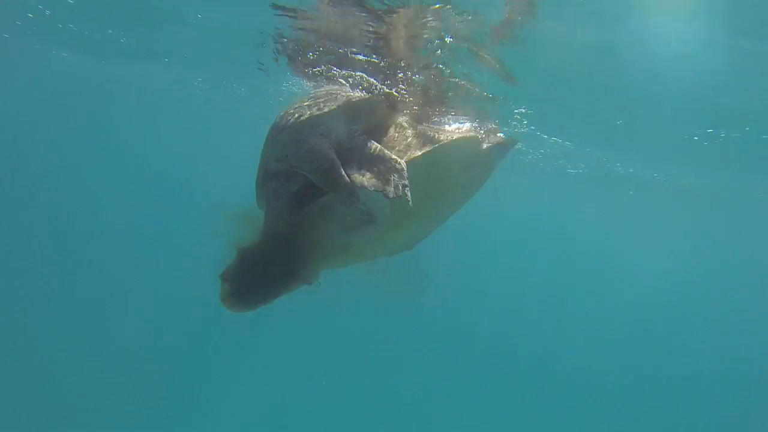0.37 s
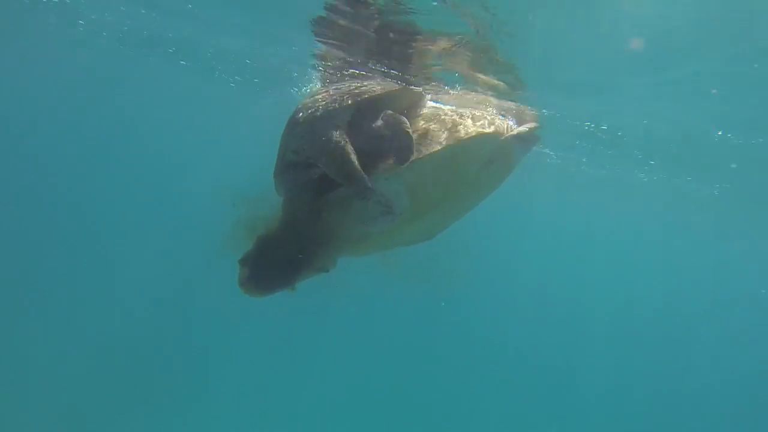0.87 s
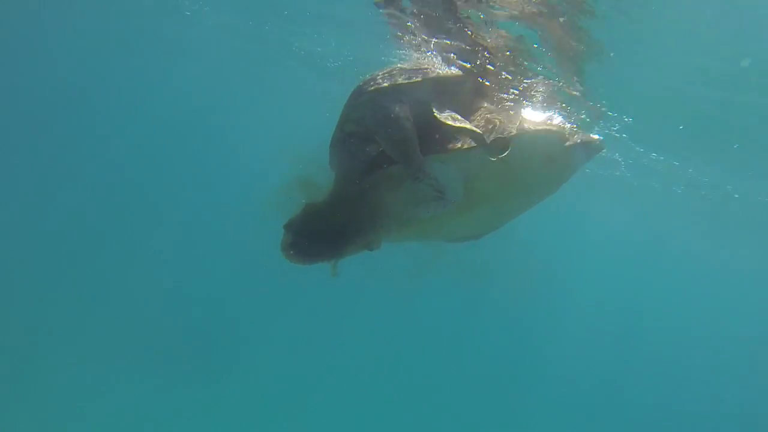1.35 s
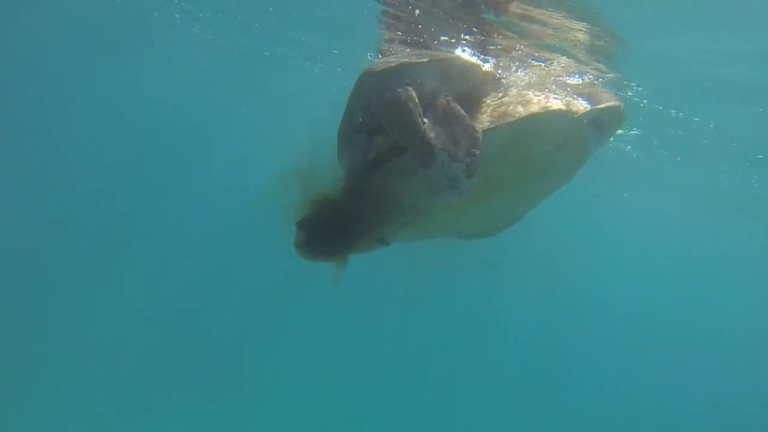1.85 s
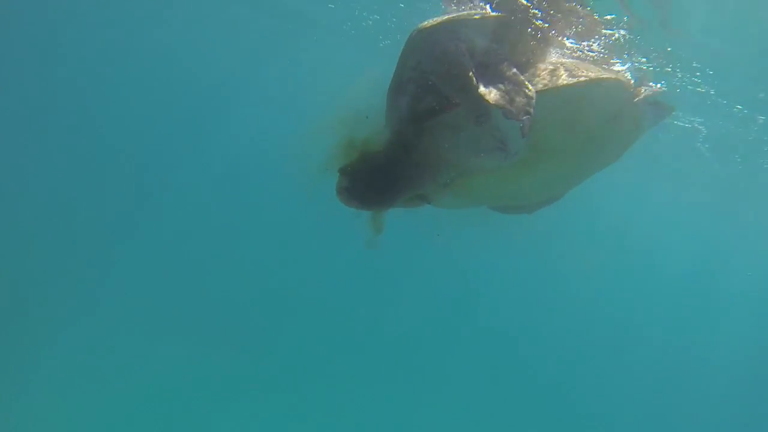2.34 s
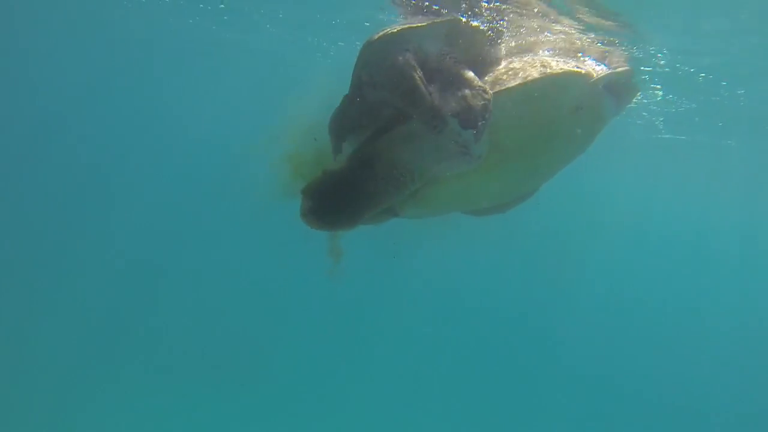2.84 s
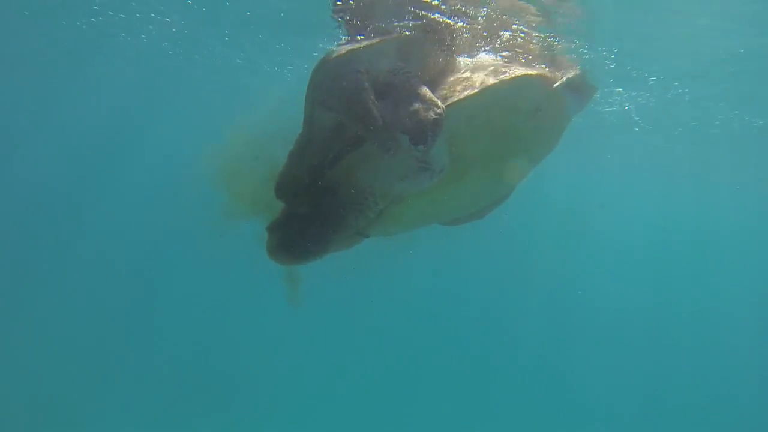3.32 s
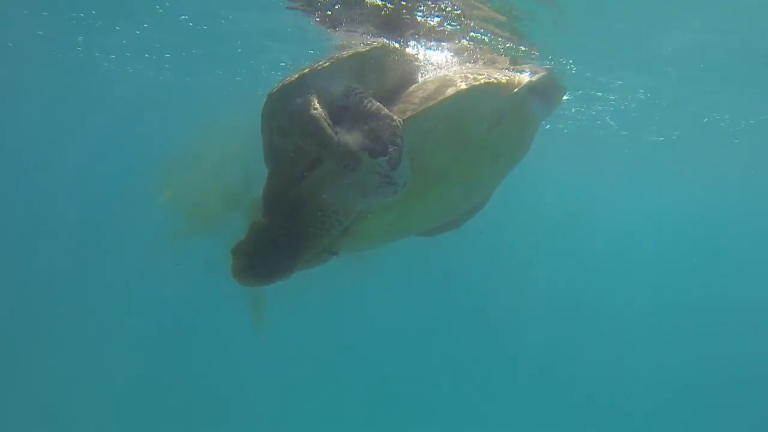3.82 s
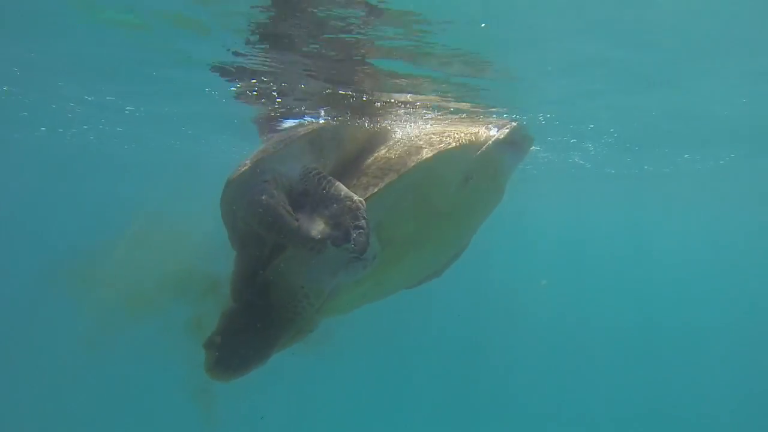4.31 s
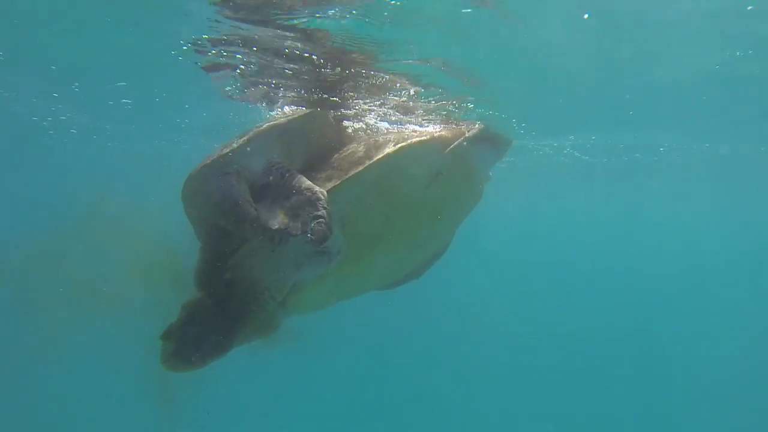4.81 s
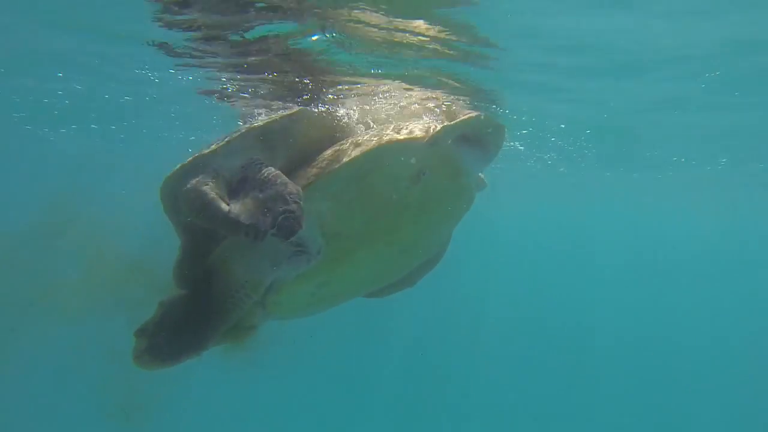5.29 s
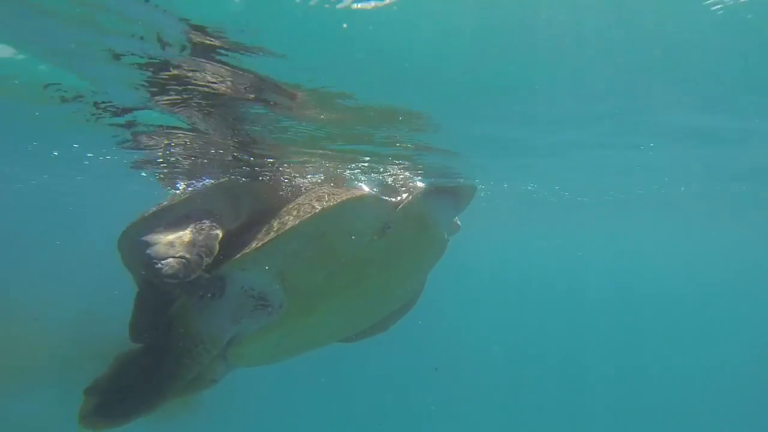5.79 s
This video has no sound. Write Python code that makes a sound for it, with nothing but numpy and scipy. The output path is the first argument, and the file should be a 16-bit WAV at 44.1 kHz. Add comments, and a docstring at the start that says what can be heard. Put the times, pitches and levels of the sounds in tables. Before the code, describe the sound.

A muffled, close underwater perspective: sub-bass rumble opens with a strong bump and keeps swelling and easing. Sparse clicks and snaps tick through the housing, sharper around one and three seconds, with short bubble plops more frequent from the middle. Soft surface wash, distant crackling and weak circuit hiss lie beneath. A prominent round bloop comes just before the end. The turtle itself makes no distinct sound.

```python
"""A deep rumble of surging water, under lapping, far crackle, nearer snaps and bubbles, hiss and a faint whine.
A camera in a sealed housing drifts just under the sea surface: the rumble is noise swelled by passing water,
lapping and crackle are noise, small bubbles and clicks through the housing's resonances, snaps are short noise
bursts, bubbles and other near rings are damped sines, and the camera's circuits add shaped hiss, steady tones
and a whine pulsed once per picture."""
import sys
import numpy as np
from scipy import signal
from scipy.fft import rfft, irfft, next_fast_len
from scipy.io import wavfile
from scipy.ndimage import uniform_filter1d, map_coordinates

SR = 44100
rng = np.random.default_rng(int(sys.argv[2]) if len(sys.argv) > 2 else 0)


def master_out(mix):
    """Clip the mix to full scale and print it as 16-bit PCM to the path in sys.argv[1]."""
    frames = np.transpose(np.atleast_2d(mix))
    ceiling = np.clip(frames, -1, 1)
    pcm = np.round(ceiling * 32767).astype(np.int16)
    wavfile.write(sys.argv[1], SR, pcm)


def voltage_ratio(decibels):
    """Convert decibels (scalar or array-like) to amplitude ratios, 20 dB per decade."""
    exponent = np.asarray(decibels, float) / 20
    return 10 ** exponent


N = 260631

# Swells of water against the housing.
# Each row: centre in seconds, level in dB before the deep filter, width in seconds (to 1/e of the power).
SWELLS = [(0, -12.5, 0.083), (0.178, -20, 0.053), (.33, -23.5, 0.14), (0.63, -21.5, 0.23),
          (0.741, -17.5, 0.047), (0.895, -21, 0.097), (1.058, -19.5, 0.067), (1.172, -21, 0.041),
          (1.405, -22, 0.076), (1.546, -17.5, 0.12), (1.7, -24.5, 0.058), (1.963, -22, 0.26),
          (2.3, -26.5, 0.3), (2.581, -20.5, 0.046), (2.686, -21.5, 0.025), (2.922, -24.5, 0.33),
          (3.11, -29, 0.047), (3.34, -23.5, 0.17), (3.447, -19.5, 0.031), (3.62, -23.5, 0.17),
          (3.897, -29.5, 0.034), (4.3, -21, 0.18), (4.433, -15.5, 0.061), (4.591, -20, 0.044),
          (4.701, -14.5, 0.058), (4.796, -22, 0.084), (5.055, -21, 0.15), (5.183, -21.5, 0.035),
          (5.298, -17, 0.052), (5.51, -24, 0.1), (5.7, -38, 0.14), (5.82, -18.5, 0.28)]
# Fine churn of the water. Each row: time in seconds, level in dB rms before its wobble.
CHURN_LEVEL = [(0.1, -41.5), (0.39, -46), (0.8, -43.5), (1.1, -46), (1.56, -42.5), (2.08, -46), (3.04, -51),
               (3.15, -43.5), (3.43, -52), (4.15, -47), (4.6, -44), (5.69, -46.5)]
# Water and camera over time. Each row: time in seconds, lapping in dB rms, far crackle in dB before
# the offset of each band, turn of the camera (no unit, roughly -1 to 1).
WATER = [(0.0, -58, -55.5, -0.36), (0.59, -59.5, -57, -0.94), (1.1, -57, -57.5, -0.41),
         (1.5, -55.5, -55.5, 0.32), (2.11, -57.5, -56.5, 0.76), (2.52, -55.5, -54.5, 0.47),
         (2.78, -56.5, -57, .6), (2.91, -53.5, -55.5, -0.32), (3.0, -55, -61, -0.79),
         (3.3, -54.5, -61.5, -1.2), (3.38, -55, -58.5, -0.49), (3.54, -55.5, -58, -0.9),
         (3.77, -57, -57, -0.089), (4.1, -54.5, -57.5, -0.64), (4.44, -56.5, -56.5, -1),
         (4.92, -56, -56.5, -0.29), (5.12, -57.5, -56.5, -0.59), (5.38, -58, -60, -0.38),
         (5.91, -60.5, -57.5, -0.71)]
# Spectra of the noise layers. Each row: frequency in Hz, relative level in dB.
SURGE_COLOUR = [(3, -45), (8, -4.5), (13, 4), (30, 3), (38, -5), (46, 4), (54, -33), (80, -70)]
CHURN_COLOUR = [(30, -52), (52, -3.5), (62, 1.5), (68, -2), (77, -8.5), (88, -15), (102, -21), (130, -61)]
SWIRL_COLOUR = [(60, -43), (105, -1.5), (140, -2.5), (170, -7.5), (300, -11.5), (600, -26)]
LAP_COLOUR = [(100, -43), (250, 3.5), (450, -2.5), (800, -1), (1300, -13.5), (2500, -47)]
CRACKLE_COLOUR = [(400, -20), (1000, -1.5), (2000, 3), (3600, -4), (4300, -10), (9000, -22.5), (15000, -28)]
HISS_COLOUR = [(500, 4.5), (2000, 1), (4500, -2.5), (7200, -3), (8600, -8), (10000, -6.5), (12800, -7),
               (14000, -12), (15200, -19)]
# Resonances of the housing. Each row: centre in Hz, width in Hz, gain in dB.
HOUSING_MODES = [(436, 170, -3.5), (680, 168, 2.5), (1140, 132, -2), (1661, 172, 2), (2508, 210, -2),
                 (2993, 374, -2), (3580, 110, -14)]
# Whine partials. Each row: frequency in Hz, level in dB rms while on (before its scatter),
# random phase step per picture in turns.
WHINE = [(5699, -75, .2), (11398, -74, .3)]
# Steady circuit tones. Each row: frequency in Hz, level in dB rms.
TONES = [(9830, -99), (9890, -94), (11149, -98), (6893, -98)]
# Near rings: bubbles, plus the ringing tail of the knock at 5.61 s and the overtones at the onset of the big
# gulp at 5.676 s. Each row: start in seconds, peak in dB, starting pitch in Hz, decay by 60 dB in seconds.
NEAR_RINGS = [(.17, -47.5, 144, 0.15), (.2, -55.5, 210, 0.49), (0.758, -44.5, 133, 0.12),
              (1.485, -52, 900, 0.064), (1.664, -43, 480, 0.083), (1.727, -41, 146, 0.052),
              (1.727, -48, 279, 0.099), (1.73, -50.5, 211, 0.8), (1.885, -47.5, 659, 0.11),
              (2.634, -48, 566, 0.063), (2.982, -46.5, 433, 0.14), (3.046, -36, 718, 0.1),
              (3.065, -47, 1810, 0.03), (3.094, -44.5, 442, .093), (3.203, -44.5, 450, 0.11),
              (3.444, -42.5, 656, 0.1), (3.63, -52.5, 804, .088), (3.843, -45.5, 556, .044),
              (3.865, -43, 426, 0.075), (4.062, -46.5, 343, 0.073), (4.237, -45.5, 750, 0.064),
              (4.45, -46, 618, 0.12), (4.487, -40.5, 633, .027), (4.689, -47, 704, 0.1),
              (4.723, -41.5, 111.4, 0.29), (5.332, -49, 578, 0.14), (5.366, -48.5, 626, 0.16),
              (5.611, -36, 640, 0.041), (5.676, -37.5, 1030, 0.021), (5.676, -46.5, 276, 0.081),
              (5.677, -43, 1470, 0.03), (5.805, -47, 666, 0.067)]
# Near snaps. Each row: start in seconds, level in dB before the path gains, tilt in dB per octave,
# extra ring of the main mode in dB, decay to 1/e in seconds (the tick's is shorter).
SNAPS = [(0.221, -55, 2, 4, 0.004), (0.3874, -50.0, -1, -1.0, 0.0029), (0.404, -47.0, 1, 4, 0.0041),
         (0.465, -52, 2, -7, 0.0037), (0.558, -56.5, 5, -5, 0.0039), (0.6696, -47, -1, -6, 0.0035),
         (0.6905, -45.5, -3, -9, 0.0095), (0.963, -57, -7.5, -7, 0.003), (1.1005, -59.5, 2.1, 18.5, 0.003),
         (1.264, -40.5, -2.5, -2, 0.0024), (1.277, -45.5, 0.5, -1.0, 0.0058), (1.324, -58, -6, 20, 0.0039),
         (1.4413, -54.5, 3, 13, 0.0041), (1.598, -49.5, 2.5, -11, 0.004), (1.724, -48, -0.3, 3, 0.0038),
         (1.776, -54.5, 1.5, 15.5, 0.0046), (1.798, -53, 1.5, -2.0, 0.0055), (2.044, -49, -2, 7.5, 0.0054),
         (2.27, -48.5, 0, 2.0, 0.0028), (2.324, -54, -8, 19.5, 0.0021), (2.531, -48.5, -8.5, 3, 0.0028),
         (2.604, -45.5, 2.9, 10, 0.0086), (2.7072, -59.5, 1.5, 14, 0.0017), (2.824, -49, 1.5, 9, 0.0055),
         (2.9287, -38.5, -0.5, 1, 0.0061), (3.0016, -50, 0.0, -10.0, 0.0039),
         (3.0954, -53, -3, -12, 0.0026), (3.335, -48.5, -0.5, -2, 0.0043),
         (3.3647, -60.5, 6.5, -8.0, 0.0025), (3.401, -57, -2, 0, 0.0032), (3.442, -54.0, -3, 5, 0.0037),
         (3.7674, -47, 5, 16.5, 0.006), (3.984, -49.5, -2, 9.0, 0.0083),
         (4.1049, -49.5, -0.5, 14.5, 0.0031), (4.217, -58, -3, 15, 0.0026),
         (4.2337, -48.5, 0.0, 5.5, 0.0051), (4.2648, -53, 1, 3, 0.004), (4.297, -55, 4.8, 0.0, 0.0055),
         (4.411, -50, -0.5, 4, 0.0059), (4.4712, -41.5, -7.5, 7.5, 0.0033),
         (4.6089, -53.5, -3, 17.5, 0.0028), (4.793, -48.5, 0.5, -7.0, 0.0038),
         (4.827, -55.5, -8, 15.0, 0.0034), (4.8875, -61, -4, 24, 0.0031), (4.9147, -57, -1, 12, 0.0037),
         (5.05, -50.5, 0.5, 9.5, 0.0043), (5.1068, -58.0, 1.3, 19.5, 0.0043),
         (5.6066, -40, -6.5, 7.0, 0.0033), (5.707, -54, 0.5, -5, 0.003), (5.7554, -47, -1.5, 4, 0.0037),
         (5.7623, -48.5, 1, 6, 0.0057)]
# Paths of a snap: ring, crack, treble tick, knock. Each row: octaves above the main mode, gain in dB.
SNAP_PATHS = [(-0.072, -2), (.82, 4), (2.4, -4), (-1.47, 0.5)]
PICTURE_HZ = 60000 / 1001  # pictures per second


def unit(x):
    """x at rms 1."""
    return x / np.sqrt(np.mean(x ** 2) + 1e-20)


def curves(rows):
    """One value per sample for each column after the time."""
    s, *columns = np.transpose(rows)
    return [np.interp(np.arange(N) / SR, s, column) for column in columns]


def wobble(rate):
    """A smooth random curve, rate knots a second."""
    knots = rng.standard_normal(int(N * rate / SR) + 4)
    return map_coordinates(knots, [np.arange(N) * rate / SR])


def filtered(x, response):
    """x times a complex response of frequency."""
    m = next_fast_len(N + SR // 2)
    return irfft(rfft(x, m) * response(np.fft.rfftfreq(m, 1 / SR)), m)[..., :N]


def coloured(x, points):
    """x shaped by (Hz, dB) points on a log axis, silent above the last."""
    f, v = np.transpose(points)
    return filtered(x, lambda hz: voltage_ratio(np.interp(np.log(hz + 1), np.log(f + 1), v, right=-120)))


def coloured_noise(points):
    """Noise at rms 1, shaped by (Hz, dB) points."""
    return unit(coloured(rng.standard_normal(N), points))


def band(x, lo_hz, hi_hz):
    """Causal band-pass."""
    sos = signal.butter(2, [lo_hz, min(hi_hz, 20000)], "bandpass", fs=SR, output="sos")
    return signal.sosfilt(sos, x)


def housing(hz):
    """Response of the housing wall: resonances of alternating sign over a weak direct path."""
    response = voltage_ratio(-19)
    for k, (centre, width, db) in enumerate(HOUSING_MODES):
        damping = 1j * hz * width
        response = response + (-1) ** k * voltage_ratio(db) * damping / (centre * centre - hz * hz + damping)
    return response


def blip(hz, rise, t60, glide):
    """A bubble's damped ring of peak 1, at most 0.4 s; its pitch glides by a share, mostly within 50 ms."""
    t = np.arange(int(min(t60, .4) * SR)) / SR
    env = (1 - np.exp(-t / rise)) ** 2 * voltage_ratio(-60 * t / t60)
    bent_time = t + glide * (t - 0.026 * (1 - np.exp(-t / 0.027)))
    return env / env.max() * np.sin(2 * np.pi * hz * bent_time)


def surge():
    """Slow pressure swings of the passing water, too heavy to swing fast."""
    t = np.arange(N) / SR
    power = voltage_ratio(-31) ** 2  # calm between the swells
    for s, db, length in SWELLS:
        power = power + voltage_ratio(db) ** 2 * np.exp(-(2 * (t - s) / length) ** 2)
    deep = coloured(rng.standard_normal(N), SURGE_COLOUR)
    size = np.abs(signal.hilbert(deep, next_fast_len(N))[:N])
    # the swings keep an even size rather than beating like free noise
    deep = unit(deep / (uniform_filter1d(size, int(.06 * SR)) + 0.1 * size.mean()) ** 1.2)
    return filtered(np.sqrt(power) * deep, lambda hz: 1 / np.sqrt(1 + (hz / 38) ** 14))


def churn():
    """The finer churn of the passing water, and a higher swirl that follows part of its swings."""
    churn_db = curves(CHURN_LEVEL)[0]
    low = coloured_noise(CHURN_COLOUR)
    follow_share = 0.47
    swirl_db = -59.5 + follow_share * (churn_db - churn_db.mean()) + 2.47 * wobble(9)
    swirl = voltage_ratio(swirl_db) * coloured_noise(SWIRL_COLOUR)
    return voltage_ratio(churn_db + 0.47 * wobble(4.5)) * low + swirl


def lapping():
    """Wavelets at the surface: a wash full of small far bubbles, both ringing the housing."""
    lap_db = curves(WATER)[0]
    far = np.zeros(N + SR)
    for when, pitch, size in rng.random((700, 3)):
        hz = 280 * 3.2 ** pitch
        ring = blip(hz, 0.5 / hz, 45 / hz, 0.11)
        far[int(when * N):][:len(ring)] += min((1 - size) ** -.3, 2.6) * ring
    wash = voltage_ratio(1.96 * wobble(18)) * rng.standard_normal(N)
    wash = unit(filtered(coloured(wash, LAP_COLOUR), housing))
    far = unit(filtered(far[:N], housing))
    return voltage_ratio(lap_db) * unit(wash + 0.7 * far)


def far_clicks(count, spread, top, length):
    """Random clicks of uneven size, each arriving as a few ms of scattered paths."""
    when, size = rng.random((count, 2)).T
    heights = np.minimum((1 - size) ** -spread, top)
    clicks = np.bincount((when * N).astype(int), heights, N)
    power = signal.lfilter([1], [1, -np.exp(-1 / (length * SR))], clicks ** 2)
    return unit(np.sqrt(power) * rng.standard_normal(N))


def crackle():
    """Countless far snaps ring the housing; its modes swell and fade as the camera turns in the water."""
    _, crackle_db, turn = curves(WATER)
    bed = unit(voltage_ratio(0.35 * wobble(3.7) + 1.15 * wobble(40)) * rng.standard_normal(N))
    clicks = far_clicks(count=1500, spread=0.47, top=5.1, length=0.0018)
    rung = filtered(coloured(bed + 1.13 * clicks, CRACKLE_COLOUR), housing)
    # a positive turn favours the low mode and shades the high ones
    murmur = voltage_ratio(crackle_db - 5.0 + 3.5 * turn) * unit(band(rung, 940, 1382))
    flutter = voltage_ratio(crackle_db + 2.5 + 1.16 * wobble(25)) * unit(band(rung, 1417, 1918))
    bright = voltage_ratio(crackle_db - 6.0 - 2.5 * turn + 0.6 * wobble(15)) * unit(band(rung, 2330, 3900))
    # the sharpest ticks pass the wall up to the highest treble
    ticks = voltage_ratio(-74) * band(far_clicks(count=260, spread=0.53, top=2.9, length=0.0012), 3160, 9700)
    return murmur + flutter + bright + ticks


def circuits():
    """Hiss and steady tones, and a whine that is on for a part of every picture while the hiss dips."""
    t = np.arange(N) / SR
    pictures = t * PICTURE_HZ
    phase, picture = pictures % 1, pictures.astype(int)
    on = uniform_filter1d((np.abs(phase - .72) < .19) * 1., int(0.0013 * SR))
    onset = np.exp(-((phase - .48) / 0.031) ** 2)  # a short surge of hiss just before the whine
    out = voltage_ratio(-66.5 - 2.4 * on + 7.0 * onset) * coloured_noise(HISS_COLOUR)
    for hz, db, turns in WHINE:
        slip = np.cumsum(turns * rng.standard_normal(picture[-1] + 1))[picture]
        # the strength changes from picture to picture
        scatter_db = 1.6 * rng.standard_normal(picture[-1] + 1)[picture]
        tone = np.sqrt(2) * np.sin(2 * np.pi * (hz * t + slip))
        out = out + voltage_ratio(db + scatter_db) * on * tone
    for hz, db in TONES:
        out = out + np.sqrt(2) * voltage_ratio(db) * np.sin(2 * np.pi * hz * t)
    return out


def near_rings():
    """Air pockets let go near the housing, each ringing at one slightly sinking pitch; with them ring the tail
    of a knock and the first overtones of the big gulp."""
    out = np.zeros(N + SR)
    for s, db, hz, t60 in NEAR_RINGS:
        rise = min(0.029 * t60, 0.0064)  # seconds
        ring = blip(hz, rise, t60, -0.026)
        out[round(s * SR):][:len(ring)] += voltage_ratio(db) * ring
    return out[:N]


def snaps():
    """Each near snap is a burst of a few ms: ring, crack and knock through the housing, a thin tick direct."""
    out = np.zeros(N + SR)
    t = np.arange(SR // 20) / SR
    pulse = np.eye(1, len(t))[0]
    wall = filtered(pulse, housing)[:len(t)]
    paths = np.array([band(band(wall, 1310, 2040), 1500, 2160),
                      band(wall, 2270, 4100),
                      band(pulse, 3200, 11800),
                      band(band(wall, 260, 1010), 260, 1320)])
    octaves, gain_db = np.transpose(SNAP_PATHS)
    ring, _, tick, _ = np.eye(4)  # each picks out one path
    lasting = (1 - (1 - 0.85) * tick)[:, None]  # the tick lasts 0.85 of the snap's length
    for s, db, tilt_db, ring_db, length in SNAPS:
        decay = np.exp(-(t / (max(length, .0005) * lasting)) ** 1.3)
        burst = rng.standard_normal((4, len(t))) * decay
        heard = signal.fftconvolve(burst, paths, axes=1)[:, :len(t)]
        heard = heard / np.abs(heard).max(axis=1, keepdims=True)
        levels_db = db + gain_db + tilt_db * octaves + ring_db * ring
        # a longer snap has a weaker tick, by 10.5 dB per doubling
        levels_db = levels_db - 10.5 * np.log2(length / 0.0035) * tick
        out[round(s * SR):][:len(t)] += voltage_ratio(levels_db) @ heard
    return out[:N]


def gulp():
    """The big bubble at the port swells, sags in pitch and breaks off."""
    out = np.zeros(N + SR)
    t = np.arange(SR // 10) / SR
    start_hz, end_hz, sag_s = 643, 564, 0.024
    rise_s, fade_db_per_s, break_s = 0.0014, 560, 0.039
    hz = end_hz + (start_hz - end_hz) * np.exp(-(t / sag_s) ** 2)
    size = (1 - np.exp(-t / rise_s)) ** 2 * voltage_ratio(-13 - fade_db_per_s * t)
    size = size * np.exp(-(t / break_s) ** 6)
    out[round(5.6745 * SR):][:len(t)] += size * np.sin(2 * np.pi * np.cumsum(hz) / SR)
    return out[:N]


def scene():
    """All sources at the single microphone."""
    water = surge() + churn() + lapping()
    return (water + crackle() + snaps() + near_rings() + gulp() + circuits())[None]


def low_pass(x):
    """Removes everything above the highest recorded frequency."""
    return signal.sosfilt(signal.butter(12, 14880, fs=SR, output="sos"), x)


def record(dry):
    """The input filter rolls off the top steeply around 14.5 kHz."""
    heard = filtered(dry, lambda hz: 1 / np.sqrt(1 + (hz / 14500) ** 32))
    return low_pass(heard)


dry = scene()
out = record(dry)
master_out(out)
```